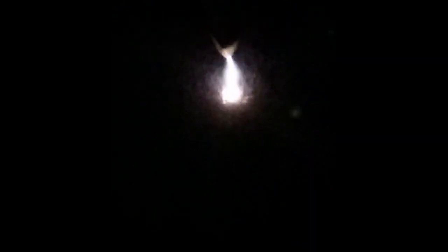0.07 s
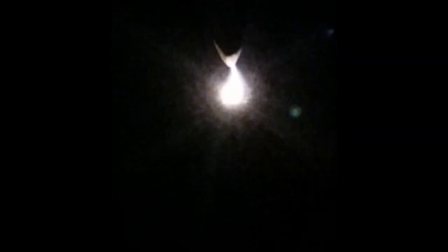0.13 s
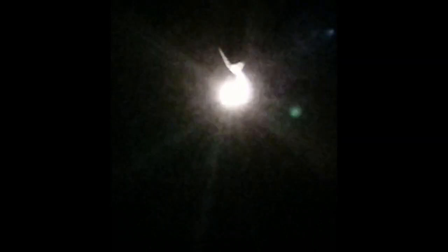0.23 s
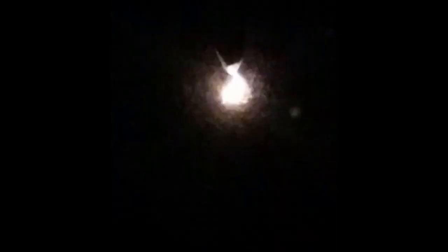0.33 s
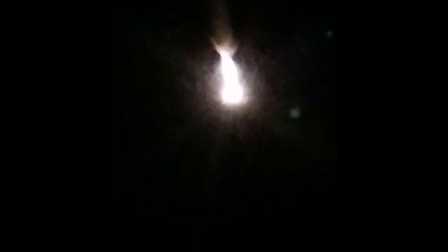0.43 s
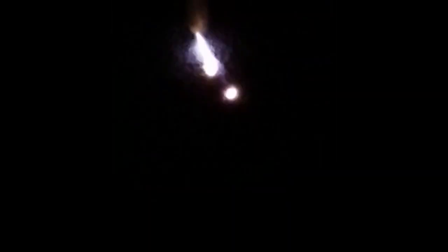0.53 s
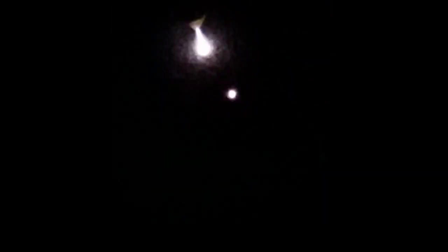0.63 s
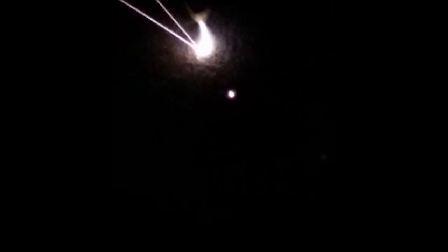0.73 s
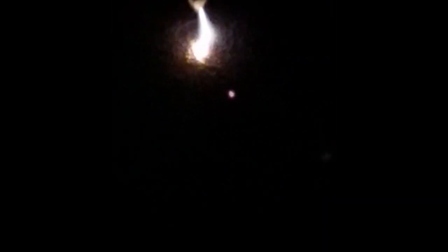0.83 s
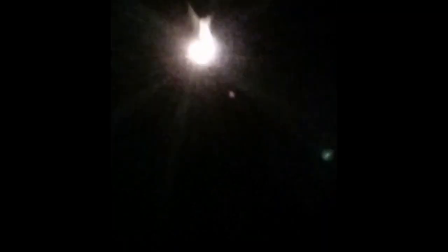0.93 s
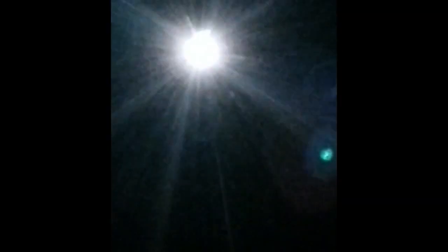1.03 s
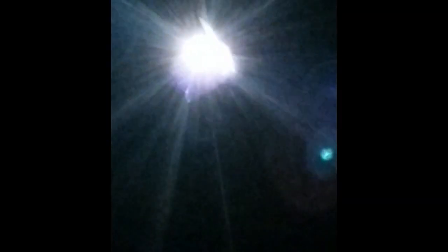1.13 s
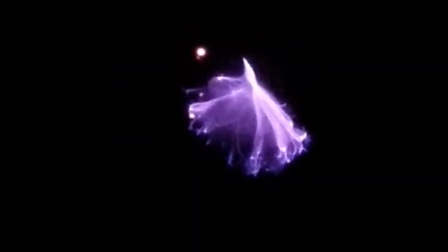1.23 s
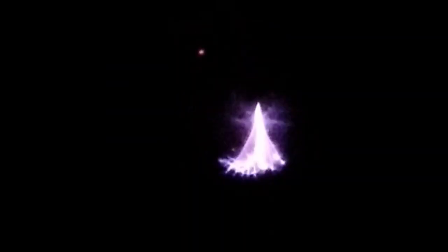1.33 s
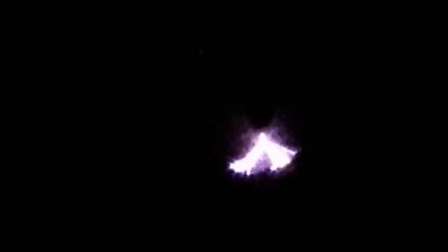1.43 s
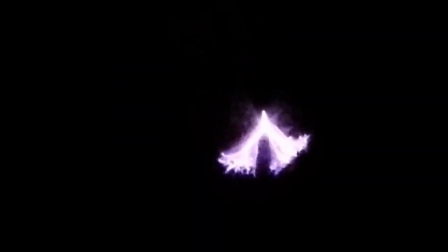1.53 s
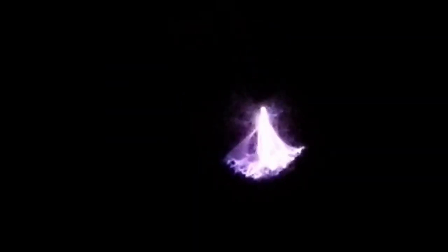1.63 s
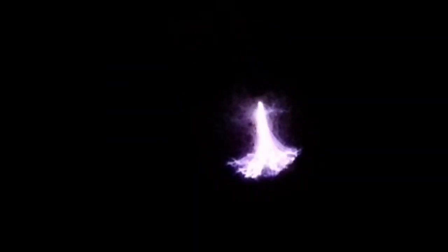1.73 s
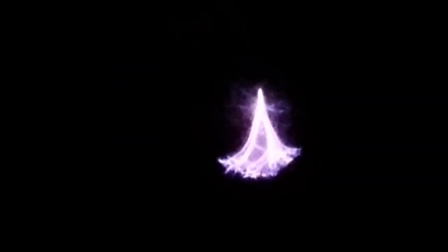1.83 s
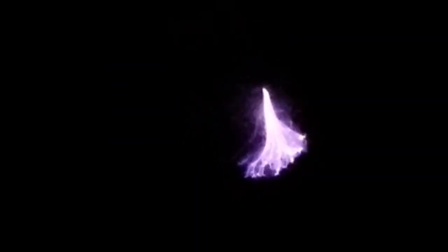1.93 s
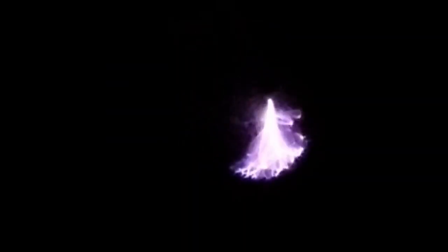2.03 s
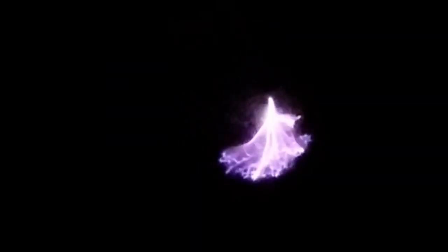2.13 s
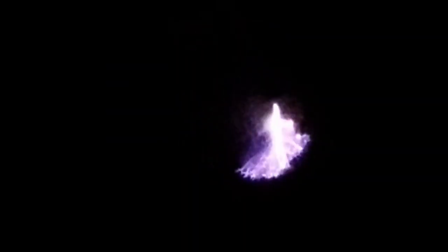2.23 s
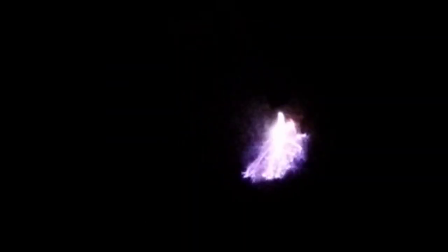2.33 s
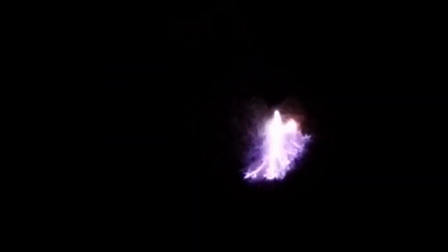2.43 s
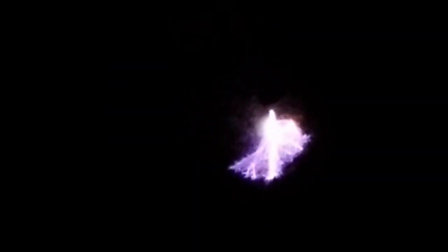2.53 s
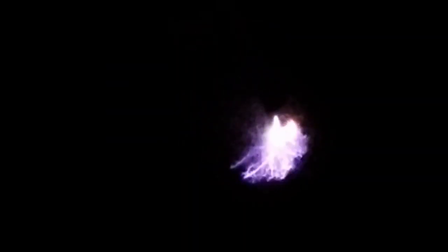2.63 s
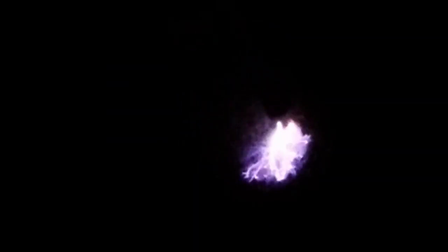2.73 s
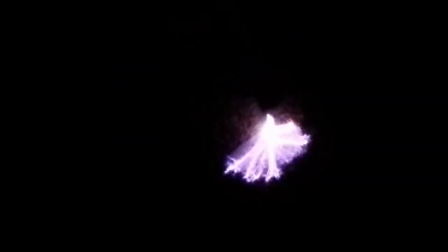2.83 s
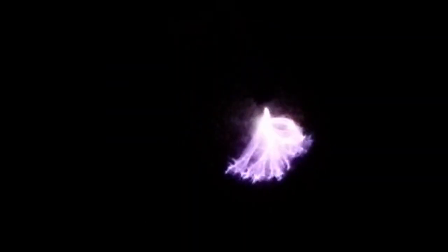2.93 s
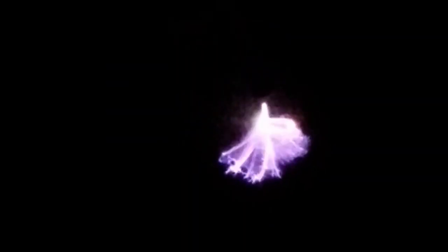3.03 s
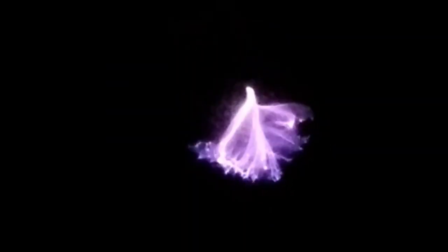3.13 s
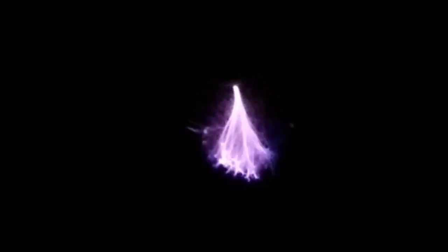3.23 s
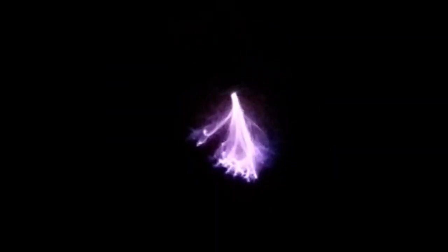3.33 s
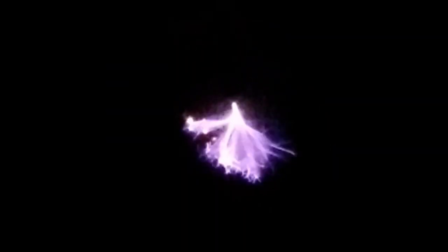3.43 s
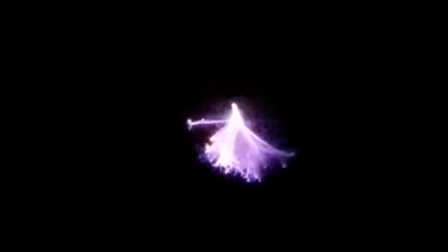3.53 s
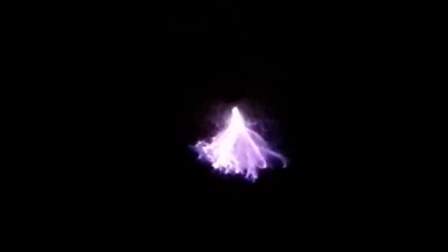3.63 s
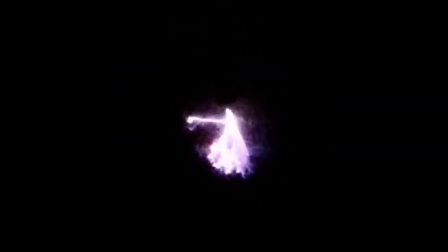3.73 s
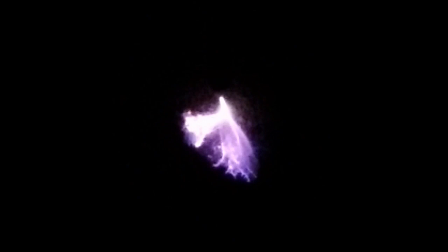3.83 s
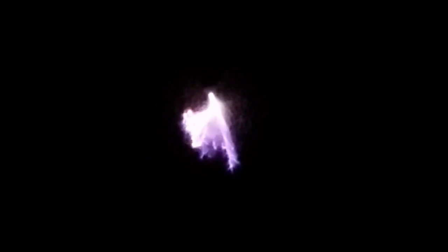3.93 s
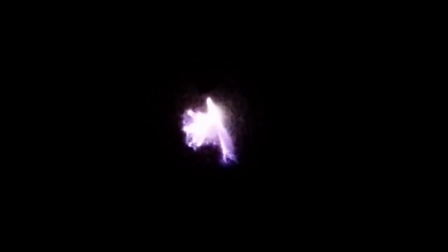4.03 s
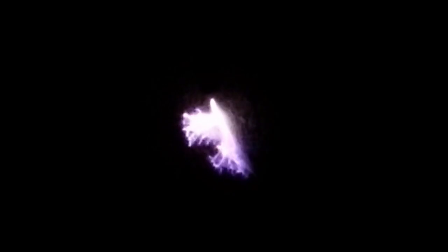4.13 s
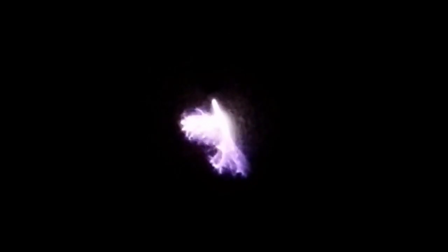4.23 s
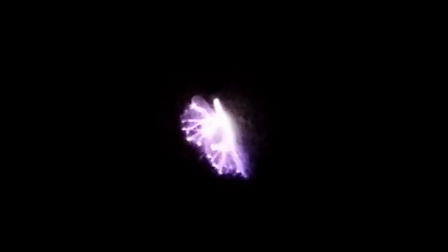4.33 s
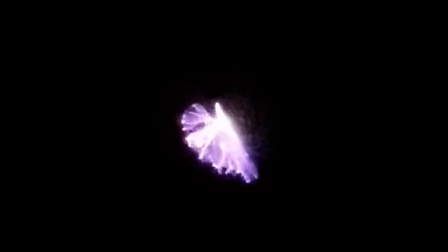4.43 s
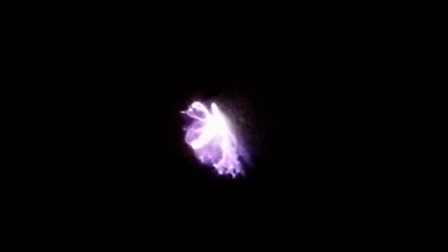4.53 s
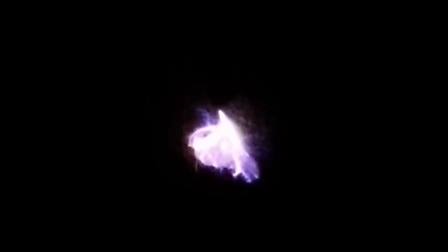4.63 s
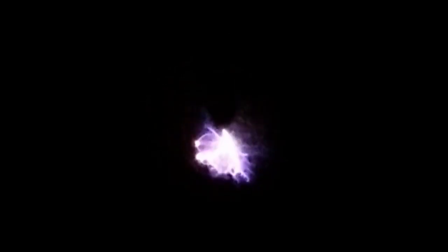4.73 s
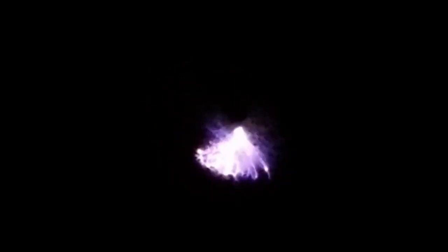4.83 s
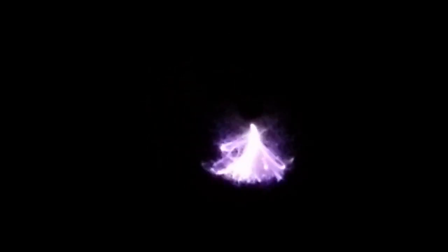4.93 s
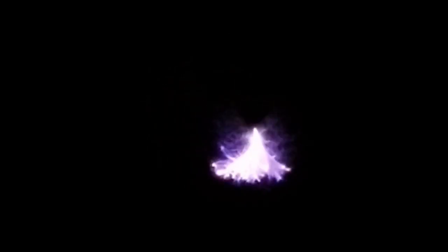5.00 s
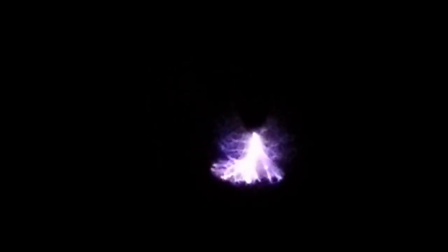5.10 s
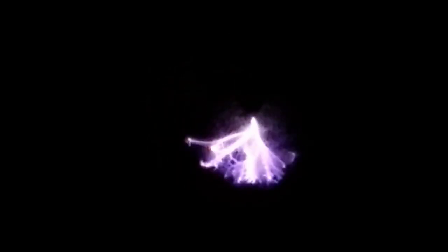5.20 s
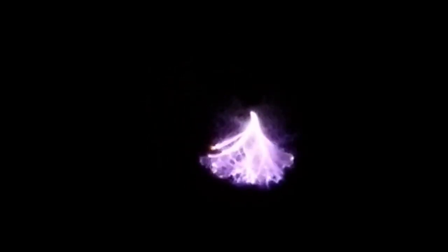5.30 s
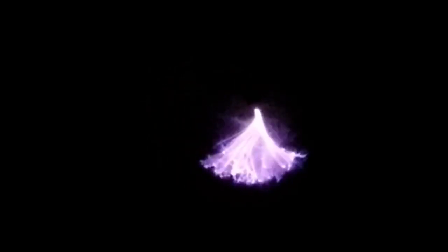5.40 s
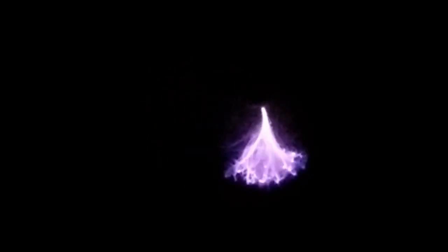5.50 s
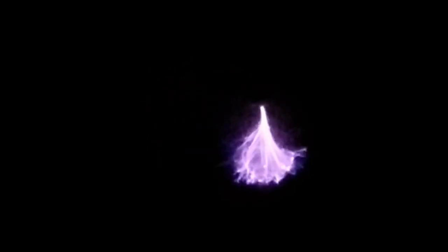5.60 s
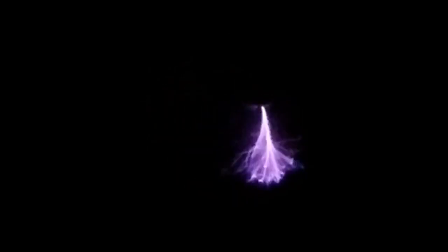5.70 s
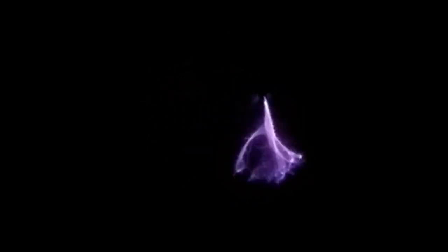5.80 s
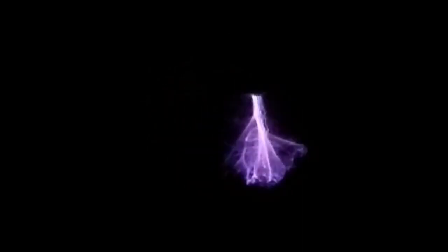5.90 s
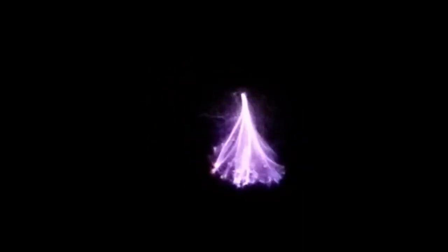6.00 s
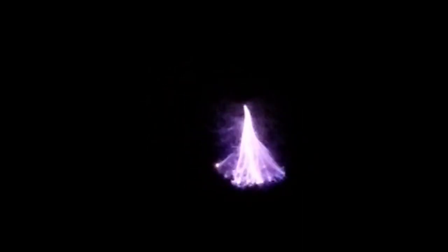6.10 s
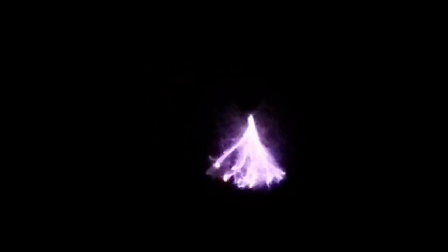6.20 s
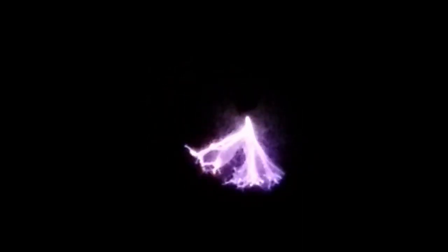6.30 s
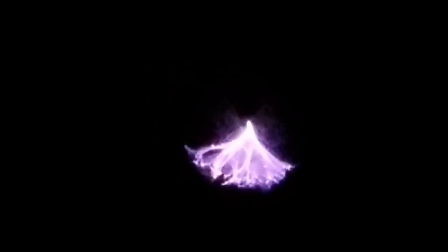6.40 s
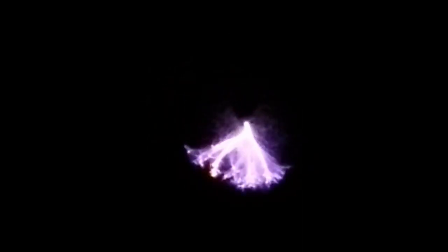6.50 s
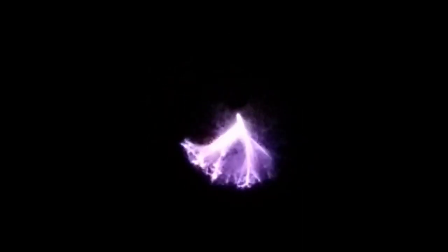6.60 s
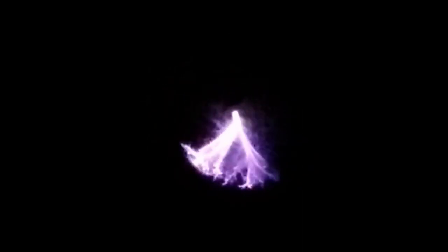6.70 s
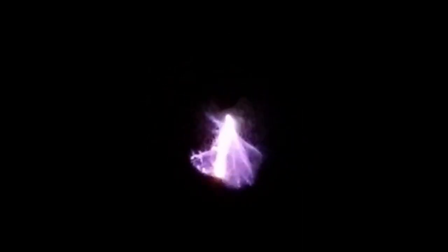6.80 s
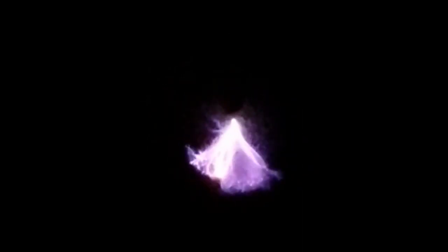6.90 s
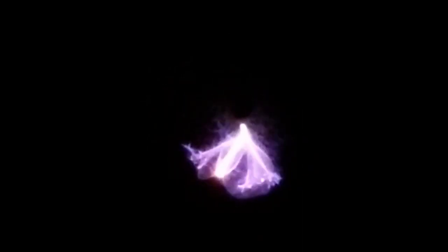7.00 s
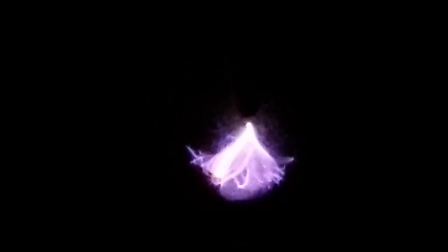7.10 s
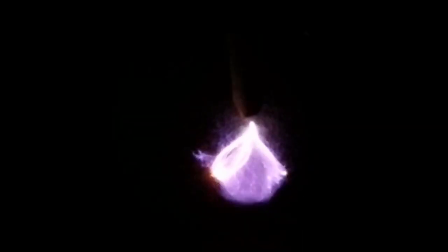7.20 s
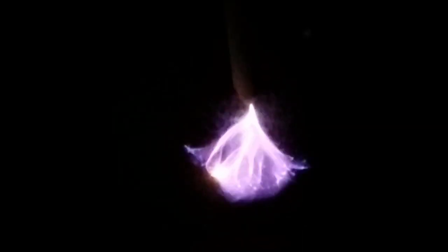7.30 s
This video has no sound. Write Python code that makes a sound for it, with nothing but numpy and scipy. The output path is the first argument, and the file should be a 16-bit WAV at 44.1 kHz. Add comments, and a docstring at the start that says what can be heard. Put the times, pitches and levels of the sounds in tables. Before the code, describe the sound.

Close electrical buzzing flares on an electrode tip, then grows into a harsh, crackling sizzle as the arc reaches powder.

```python
"""A thin buzz flares on an electrode's tip, then a mains-fed high-voltage arc reaches a heap of powder. In
every half-cycle the gap strikes with a snap and streamers sizzle over the powder, at times so evenly that they
whistle. Drawn long, the arc mostly sizzles; burning short, it sputters and throbs. Small workshop, two-port
microphone close by, the supply humming below."""
import sys
import numpy as np
from scipy import signal
from scipy.fft import rfft, irfft, next_fast_len
from scipy.io import wavfile
from scipy.ndimage import map_coordinates

SR = 44100
rng = np.random.default_rng(int(sys.argv[2]) if len(sys.argv) > 2 else 0)


def digitize_waveform(pressure):
    """Quantize a signal to 16-bit integers and store it at the path in sys.argv[1].

    Rows of a 2-D input are taken as channels; values are limited to [-1, 1].
    """
    field = np.atleast_2d(pressure).T
    bounded = np.clip(field, -1, 1)
    quanta = np.round(bounded * 32767).astype(np.int16)
    wavfile.write(sys.argv[1], SR, quanta)


N = 324135
TIME = np.arange(N) / SR
MAINS_HZ = 60
# pops of the arc's foot, also the thud of a hard spark: frequency_hz, gain_db
POP_COLOUR = [(40, -22), (250, -11), (600, -4), (1200, 3.5), (2500, -2), (5000, -4), (9000, -8.5),
              (15000, -36)]


def amp(db):
    """Decibels to gain."""
    return 10 ** (np.asarray(db) / 20)


def unit(x):
    """Scaled to rms 1."""
    return x / np.sqrt(np.mean(x ** 2) + 1e-20)


def along(points, hz):
    """Interpolates (frequency_hz, value) points on a log axis."""
    freqs, values = np.transpose(points)
    return np.interp(np.log(hz + 1), np.log(freqs + 1), values)


def curves(rows):
    """One value per sample for each column after the time."""
    times, *columns = np.transpose(rows)
    return [np.interp(TIME, times, column) for column in columns]


def gate(start, end, rise_s, fall_s):
    """Rises to 1 around the start, holds, and falls to 0 around the end."""
    return np.clip(np.minimum((TIME - start) / rise_s, (end - TIME) / fall_s) + .5, 0, 1)


def swells(rows, rise_s, fall_s):
    """(start_s, end_s, values) rows as one curve for each value, 0 between the events."""
    return sum(np.outer(values, gate(start, end, rise_s, fall_s)) for start, end, *values in rows)


def wobble(rate_hz):
    """A smooth random curve with rate_hz knots a second."""
    return map_coordinates(rng.standard_normal(SR // 100), [TIME * rate_hz], mode="mirror")


def uneven(count, spread_db, ceiling=2):
    """Random sizes, normal in decibels with the extremes clipped."""
    return amp(spread_db * np.clip(rng.standard_normal(count), -2, ceiling))


def filtered(x, response):
    """x through a complex frequency response."""
    size = next_fast_len(x.shape[-1] + SR // 2)
    return irfft(rfft(x, size) * response(np.fft.rfftfreq(size, 1 / SR)), size)[..., :x.shape[-1]]


def coloured(x, points, size=4096):
    """x through a minimum-phase filter shaped by (frequency_hz, gain_db) points."""
    cepstrum = irfft(np.log(amp(along(points, np.fft.rfftfreq(size, 1 / SR)))))
    cepstrum[1:size // 2] *= 2
    cepstrum[size // 2 + 1:] = 0
    kernel = np.array(irfft(np.exp(rfft(cepstrum))), ndmin=x.ndim)
    return signal.fftconvolve(x, kernel, axes=-1)[..., :x.shape[-1]]


def ringing(x, modes):
    """x plus the resonances that it excites."""
    return filtered(x, lambda hz: 1 + sum(
        amp(db) * 1j * hz * width / (pitch ** 2 - hz ** 2 + 1j * hz * width)
        for pitch, width, db in modes))


def pulses(times, sizes, order=8):
    """Sharp pulses placed between samples."""
    taps = np.floor(times * SR).astype(int)[:, None] + np.arange(1 - order, order + 1)
    offset = taps - times[:, None] * SR
    shape = np.sinc(offset) * np.cos(np.pi * offset / (2 * order)) ** 2
    return np.bincount(np.clip(taps, 0, N).ravel(), (sizes[:, None] * shape).ravel(), N + 1)[:N]


def hum(level_db, mains_db, floor_db):
    """The supply hums at the mains frequency and its octave over the faint rush of the room."""
    # room tone: frequency_hz, gain_db
    rush_colour = [(20, 2), (60, -6.5), (250, -7.5), (1000, -4), (5000, -3), (15000, -40)]
    phase = 2 * np.pi * MAINS_HZ * TIME
    rush = unit(coloured(rng.standard_normal(N), rush_colour))
    return amp(level_db) * np.sin(2 * phase) + amp(mains_db) * np.sin(phase) + amp(floor_db) * rush


def room_tail(delay_s=.0009):
    """The room's short scattered answer at the two ports."""
    # reverberation time: frequency_hz, t60_s
    decay = [(100, 0.59), (4000, 0.029), (15000, 0.047)]
    # likeness of left and right: frequency_hz, correlation
    likeness = [(300, 0.93), (1000, 0.12), (3000, 0.092)]
    hz, age_s, noise = signal.stft(rng.standard_normal((2, SR // 3)), SR, nperseg=128)
    dying = noise * amp(-60 * age_s / along(decay, hz)[:, None])
    angle = np.arccos(np.clip(along(likeness, hz), 0, 1))[:, None] / 2
    mid, side = dying[0] * np.cos(angle), dying[1] * np.sin(angle)
    tail = signal.istft(np.array([mid + side, mid - side]), SR, nperseg=128)[1]
    return np.pad(tail / np.linalg.norm(tail[0]), ((0, 0), (round(delay_s * SR), 0)))


def workshop(direct, wet_db, path_count=5):
    """Direct sound, near echoes and a short tail whose paths shift as the arc moves."""
    # small things return mostly treble: frequency_hz, gain_db
    echo_colour = [(400, -18), (1300, -14), (3000, -1), (6000, 0)]
    # bench and nearby things, left port then right: delay_ms, level_db
    echoes = [
        [(1.4, -13), (2.2, -14), (3.05, -20)],
        [(.48, -21), (1.25, -17), (2.5, -20)],
    ]
    reflected = coloured(direct, echo_colour)
    near = filtered(reflected, lambda hz: np.array([
        sum(amp(db) * np.exp(-2j * np.pi * hz * ms / 1000) for ms, db in port) for port in echoes]))
    paths = np.array([wobble(rate_hz=3) for _ in range(path_count)])
    paths /= np.linalg.norm(paths, axis=0)
    tail = sum(signal.oaconvolve(reflected * path, room_tail(), axes=1)[:, :N] for path in paths)
    return direct + near + amp(wet_db) * tail


def half_cycles(delay_ms):
    """Breakdown times, and for each sample its half-cycle number and the ms since breakdown."""
    rate_hz = 2 * MAINS_HZ
    turns = (TIME - delay_ms / 1000) * rate_hz + 1
    starts = np.interp(np.arange(int(N / SR * rate_hz) + 3), turns, TIME, left=-1, right=N)
    return starts, turns.astype(int), turns % 1 * 1000 / rate_hz


def scatter(starts, spread_db, polarity_db):
    """A size for each half-cycle; the two polarities differ a little."""
    return uneven(len(starts), spread_db) * amp(polarity_db * (-1) ** np.arange(len(starts)))


def burst(age_ms, rise_ms, fall_ms):
    """Activity swells after breakdown and dies as the voltage falls."""
    return (1 - np.exp(-(age_ms / rise_ms) ** 2)) * np.exp(-age_ms / fall_ms)


def flame(starts, level_db):
    """Each surge of current heats the air column, which throbs unevenly and rumbles as it churns."""
    # the hot air heaves: start_s, end_s, gain_db, extra_rumble_db
    heaves = [(1.13, 1.31, 10, 0), (1.31, 1.42, 10, 8), (1.83, 1.97, 6, 3), (2.13, 2.2, 7, 3),
              (2.27, 2.425, 8, 7), (2.495, 2.535, 8, 9), (2.615, 2.655, 11, 7), (2.7, 2.905, 7, 9),
              (2.94, 3.06, 3, 8), (3.19, 3.31, 11, 3), (3.59, 3.83, 4, 4), (3.98, 4.07, 8, 3),
              (4.21, 4.32, 5, 1), (4.43, 4.57, 7.5, 2), (4.69, 4.78, 9, 5), (5.05, 5.17, 3, 5),
              (5.17, 5.26, 7, 6), (5.26, 5.45, 4.5, 3), (6.45, 6.58, 8, 1), (6.73, 6.87, 6, 1),
              (7.22, 7.35, 7, 3)]
    # churning air: frequency_hz, gain_db
    rumble_colour = [(30, -22), (70, -7), (110, 0), (170, -4), (260, -8), (500, -26), (1000, -60)]
    # swelling air: frequency_hz, gain_db
    throb_colour = [(20, -36), (55, 1.5), (80, -3), (108, 6), (180, -1.5), (245, -1), (400, -3),
                    (900, -39.5)]
    heave_db, churn_db = swells(heaves, rise_s=.027, fall_s=.045)
    flutter_db = 1.9 * wobble(rate_hz=24)
    rumble = unit(coloured(rng.standard_normal(N), rumble_colour))
    times = starts + rng.normal(0, .00037, len(starts))
    surges = pulses(times, scatter(starts, spread_db=3, polarity_db=2.5))
    throb = unit(coloured(surges - surges.mean(), throb_colour))
    return amp(level_db + heave_db + flutter_db) * (throb + amp(churn_db - 12) * rumble)


def sputter(spread_db, count=5000):
    """The arc's foot hops from grain to grain with small irregular pops."""
    times = rng.uniform(0, N / SR, count)
    sizes = uneven(count, spread_db) * rng.choice([-1, 1], count)
    return unit(coloured(pulses(times, sizes), POP_COLOUR))


def spits(starts, spread_db, lag_s):
    """Just after breakdown a grain of powder bursts with a tick: mostly tiny, now and then loud."""
    # bursting grains: frequency_hz, gain_db
    tick_colour = [(300, -24), (3000, -19), (6000, 11), (10000, -13), (15000, -13)]
    count = len(starts)
    times = starts + lag_s * rng.random(count)
    sizes = uneven(count, spread_db, ceiling=1.7) * rng.choice([-1, 1], count)
    return unit(coloured(pulses(times, sizes), tick_colour))


def sizzle(starts, cycle, age_ms, spiky_db, between):
    """Tiny sparks swarm after each breakdown; they fan out, so each port hears them differently."""
    # spark swarm: frequency_hz, gain_db
    sizzle_colour = [(60, -25), (500, -21.5), (1500, -5), (3000, -3), (5000, 1.5), (9000, 4), (15000, -13)]
    centre, left, right = rng.standard_normal((3, N))
    sparks = (centre + np.array([left, right])) * uneven(N, spiky_db)
    sizes = scatter(starts, spread_db=1.2, polarity_db=-.4)[cycle]
    swarm = burst(age_ms, rise_ms=.55, fall_ms=.8) * sizes
    return unit(coloured(sparks * (swarm + between), sizzle_colour))


def firing(stretch, loose_hz=4620):
    """Rate and level of the whistle: faint at rest, strong and gliding while the streamers lock."""
    # streamers in step: start_s, end_s, first_hz, last_hz, gain_db
    glides = [(1.72, 1.987, 4450, 4600, 8.5), (2.06, 2.208, 4750, 4450, 9), (2.208, 2.33, 4100, 4300, 11),
              (2.33, 2.42, 4300, 5400, 11.5), (3.268, 3.348, 3550, 4550, 15),
              (3.348, 3.405, 4800, 5300, 11), (3.604, 3.807, 4600, 5900, 5.5),
              (5.076, 5.215, 4900, 6300, 10), (5.32, 5.45, 6400, 5400, 13.5), (5.45, 5.655, 5400, 4150, 13),
              (5.94, 6.025, 5600, 5300, 20), (6.715, 6.89, 6000, 4750, 12.5)]
    rate_hz, locked, locked_db = loose_hz, 0, 0
    for start, end, first_hz, last_hz, db in glides:
        lock = gate(start, end, rise_s=.03, fall_s=.03)
        rate_hz = np.where(lock > locked, np.interp(TIME, [start, end], [first_hz, last_hz]), rate_hz)
        locked += lock
        locked_db += lock * (db - 8 * stretch)  # weaker in a long arc
    loose_db = -10 + 13.5 * stretch
    return rate_hz, locked_db + (1 - locked) * loose_db


def whistle(starts, cycle, age_ms, rate_hz, spread, overtone_db):
    """Streamers charge and fire in step, at a slightly new rate in each half-cycle."""
    pitch_hz = rate_hz * np.exp(rng.normal(0, spread, len(starts)))[cycle]
    phase = 2 * np.pi * pitch_hz * age_ms / 1000 + rng.normal(0, 1.5, len(starts))[cycle]
    sizes = scatter(starts, spread_db=.9, polarity_db=.2)[cycle]
    swarm = burst(age_ms, rise_ms=.2, fall_ms=.45) * sizes
    return unit(swarm * (np.sin(phase) + amp(overtone_db) * np.sin(2 * phase)))


def hard_sparks(crack_db, thud_db, fall_s):
    """Now and then one spark branches and cracks much louder than the rest."""
    # single sparks: start_s, level_db, relative_thud_db
    sparks = [(0.612, -24, -27), (0.628, -19, -27), (0.646, -27, -7), (0.695, -22, -22), (0.731, -14, -8),
              (1.323, -8, -9), (1.338, -16, -12), (1.357, -12, -6), (1.769, -7, -42), (2.186, -3, -42),
              (2.27, -13, -42), (2.502, -9, -20), (4.469, -18, -30), (4.735, -19, -20), (4.803, -19, -30),
              (4.918, -13, -32), (5.102, -6, -42), (5.822, -2.5, -22), (6.038, -7, -24), (6.428, -14, -36),
              (6.536, -9, -26), (6.553, -12, -36), (6.645, -13, -36), (7.086, -14, -30), (7.27, -15, -30)]
    # their crack: frequency_hz, gain_db
    crack_colour = [(60, -41), (500, -22), (1500, -13), (3000, -6), (4800, 6), (8000, 0), (15000, -11)]
    start_s, level_db, relative_thud_db = np.transpose(sparks)
    times = start_s + .001
    branches = np.exp(-TIME[:SR // 100] / fall_s)
    envelope = signal.fftconvolve(pulses(times, amp(level_db + crack_db)), branches)[:N]
    cracks = coloured(envelope * rng.choice([-1, 1], N), crack_colour)
    thuds = coloured(pulses(times, amp(level_db + relative_thud_db + thud_db)), POP_COLOUR)
    return cracks + thuds


def strikes(starts, colour, on_powder, jitter_s, spread_db):
    """The gap breaks down each half-cycle; on powder a wandering branch makes the overtones waver."""
    times = starts + rng.normal(0, jitter_s, len(starts))
    sizes = scatter(starts, spread_db, polarity_db=-.75)
    lag_s = .0012 + .0004 * np.interp(starts, TIME, wobble(rate_hz=9))
    branch = .5 * on_powder * wobble(rate_hz=9) * pulses(times + lag_s, sizes)
    return unit(coloured(pulses(times, sizes) + branch, colour))


def burning():
    """Stretch, body level and streamer level as the arc flares, is drawn long, falters and flickers."""
    # strength of the arc: time_s, body_db, streamer_db
    strength = [(0, -58, -61.5), (.5, -60.5, -63.5), (.85, -57.5, -57.5), (1.2, -57.5, -56),
                (1.34, -42, -38), (1.55, -38.5, -36.5), (1.9, -43, -32.5), (2.35, -40, -37.5),
                (2.6, -42.5, -36), (3.28, -41, -36.5), (3.75, -42.5, -38), (4.15, -44.5, -45.5),
                (4.96, -40.5, -45.5), (5.04, -36.5, -37), (5.4, -41, -35), (6.3, -39, -44),
                (6.42, -44, -40.5), (6.9, -41, -45.5), (7.35, -36.5, -47.5)]
    # the arc flares up, on the electrode's tip before 1.3 s and on the powder after: start_s, end_s,
    # streamer_gain_db
    flares = [(0, .27, 5), (.565, .612, 10), (.608, .76, 10.5), (.952, 1.125, 6.5), (1.278, 1.33, 2.5),
              (1.718, 1.8, 0.5), (3.96, 4.06, 4), (4.755, 4.83, 3)]
    # the arc is drawn long: start_s, end_s, stretch (0-1), streamer_gain_db
    draws = [(1.36, 1.485, 0.66, 10.5), (1.97, 2.16, 0.59, 5.5), (3.35, 3.57, 0.92, 6),
             (5.6, 6.36, 0.87, 8.5)]
    # the streamers falter and the sizzle dips; around 5.8-6.0 s the whole arc briefly drops out:
    # start_s, end_s, streamer_gain_db, body_gain_db
    dips = [(2.197, 2.265, -2, 0), (4.84, 4.91, -3, 0), (4.93, 4.985, -5, -0.5), (5.807, 5.821, -20, -9),
            (5.828, 5.838, -15, -12), (5.936, 6.03, -17, -13), (6.37, 6.42, -3, 0.5), (6.493, 6.53, -6, 0)]
    body_db, streamer_db = curves(strength)
    flare_db, = swells(flares, rise_s=.0047, fall_s=.018)
    stretch, drawn_db = swells(draws, rise_s=.057, fall_s=.0355)
    streamer_dip_db, body_dip_db = swells(dips, rise_s=.0012, fall_s=.0012)
    flicker_db = .67 * wobble(rate_hz=19)
    body_db += .49 * flare_db + body_dip_db + flicker_db
    streamer_db += flare_db + drawn_db + streamer_dip_db + flicker_db
    return stretch, body_db, streamer_db


def discharge(touchdown_s=1.3):
    """All the sounds of the arc, first on the electrode's tip, then walking on the powder."""
    # how finely the streamers split: time_s, sizzle_share_db
    splitting = [(0, 10), (1.25, 1), (1.5, -3.5), (2.1, -0.5), (2.65, -8), (3.6, 2), (4.15, -4.5), (5.4, 0),
                 (6.4, 3.5), (7.35, 10.5)]
    # the walk of the arc's foot: time_s, sputter_share_db, strike_share_db
    footing = [(.55, -7, 10), (.66, 11, 1), (.8, -3, 8.5), (1.28, -5, 3), (1.35, 2.5, 2.5),
               (1.55, -6.5, -5), (2.9, 1, 1), (5.2, -5.5, -2.5), (7.35, -2, -4)]
    # strike of the arc's body: frequency_hz, gain_db
    buzz_colour = [(40, -32), (360, -13), (480, 2.5), (600, 0.5), (750, -0.5), (960, 2.5), (1200, -0.5),
                   (1450, 2), (2400, -7), (5000, -13), (15000, -26)]
    # strike of the streamers: frequency_hz, gain_db
    snap_colour = [(200, -7), (1000, -7.5), (2400, 4.5), (2850, 3), (3500, 8.5), (5000, 9.5), (6000, 8),
                   (8500, -1.5), (15000, -51)]
    # each snap rings what lies under the powder: pitch_hz, width_hz, level_db
    bed_modes = [(2400, 90, -2), (3960, 70, -1), (6880, 200, -3)]
    # the thinner sound on the tip: frequency_hz, gain_db
    tip_colour = [(120, 2.5), (550, -2), (950, 2), (1400, 3), (2400, 1.5), (3300, 5), (5300, -2), (7500, 0),
                  (13000, -5)]
    # the electrode rings under the arc: pitch_hz, width_hz, level_db
    electrode_modes = [(3490, 170, -3.5), (4340, 170, -3)]

    stretch, body_db, streamer_db = burning()
    split_db, = curves(splitting)
    sizzle_db = streamer_db + split_db
    sputter_db, strike_db = curves(footing)
    rate_hz, whistle_db = firing(stretch)
    on_powder = np.interp(TIME, [touchdown_s - .1, touchdown_s], [0, 1])
    on_tip = 1 - on_powder
    # a longer gap needs more voltage: it breaks down later, and into streamers instead of one spark
    starts, cycle, age_ms = half_cycles(delay_ms=3.15 + 1.272 * stretch + .68 * on_tip)
    strike_db -= 11 * stretch
    waver_db = 1.5 * on_powder * wobble(rate_hz=14)

    buzz = strikes(starts, buzz_colour, on_powder, jitter_s=1.5e-5, spread_db=.34)
    buzz *= amp(body_db + strike_db + waver_db)
    snap = strikes(starts, snap_colour, on_powder, jitter_s=1.2e-5, spread_db=1.1)
    snap *= amp(streamer_db + strike_db)
    snap = on_tip * snap + on_powder * ringing(snap, bed_modes)
    pops = amp(body_db + sputter_db - 5.3 * stretch + 4) * sputter(spread_db=3.5)
    fizz = amp(sizzle_db + 5.5) * sizzle(starts, cycle, age_ms, spiky_db=6, between=.049)
    tone = whistle(starts, cycle, age_ms, rate_hz, spread=.055, overtone_db=-22)
    tone *= amp(sizzle_db + whistle_db - 2)
    heave = flame(starts, level_db=body_db - 13.5 - 6.5 * stretch)
    ticks = amp(sizzle_db - 4.5 - 9 * stretch) * spits(starts, spread_db=6, lag_s=.00101)
    cracks = hard_sparks(crack_db=-1.5, thud_db=23.5, fall_s=.0006)
    arc = buzz + snap + pops + fizz + tone + heave + ticks + cracks
    return on_powder * arc + on_tip * ringing(coloured(arc, tip_colour), electrode_modes)


def scene():
    """The arc in the workshop, close to the microphone's resonant ports; left and right differ in level and
    phase across the band."""
    # response of the ports: frequency_hz, gain_db
    port_colour = [(120, -3), (370, -4), (580, -0.5), (1400, 0), (1900, -8.5), (2500, -2.5), (3100, -5),
                   (4300, -.5), (5000, -2), (5600, 0.5), (8400, -5.5), (10100, -3.5), (13000, 3.5)]
    # cavities behind the ports: pitch_hz, width_hz, level_db
    cavity_modes = [(2400, 330, -3.5), (4230, 200, -5), (4870, 380, 3), (7000, 450, -2.5), (9250, 300, -8),
                    (10170, 280, -2)]
    # level between left and right: frequency_hz, left_minus_right_db
    balance = [(250, 1), (600, -1), (830, -6.5), (1400, 3), (2300, 5), (2700, -9.5), (3200, 9), (3800, 1),
               (4900, 9.5), (6400, -2), (9000, 1), (13000, 2.5)]
    # phase between left and right: frequency_hz, left_lead_rad
    lead = [(400, 0), (720, 0.57), (850, 1), (1300, 1.57), (1750, 2), (2450, 1.5), (2880, 3), (3530, 0.92),
            (4100, 3.5), (5000, 3), (5900, 3.5), (6500, 4), (13000, 6), (15800, 12)]
    arc = ringing(coloured(discharge(), port_colour), cavity_modes)
    pair = workshop(arc, wet_db=.5) + hum(level_db=-75, mains_db=-77, floor_db=-56)
    sides = np.array([[.5], [-.5]])
    return filtered(pair, lambda hz: amp(sides * along(balance, hz))
                    * np.exp(1j * sides * along(lead, hz)))


def record(dry):
    """The hardest cracks are rounded off, and nothing is kept above the band limit."""
    ceiling, top_hz = .9, 15850
    rounded = dry / (1 + (dry / ceiling) ** 6) ** (1 / 6)
    return filtered(rounded, lambda hz: hz < top_hz)


dry = scene()
out = record(dry)
digitize_waveform(out)
```